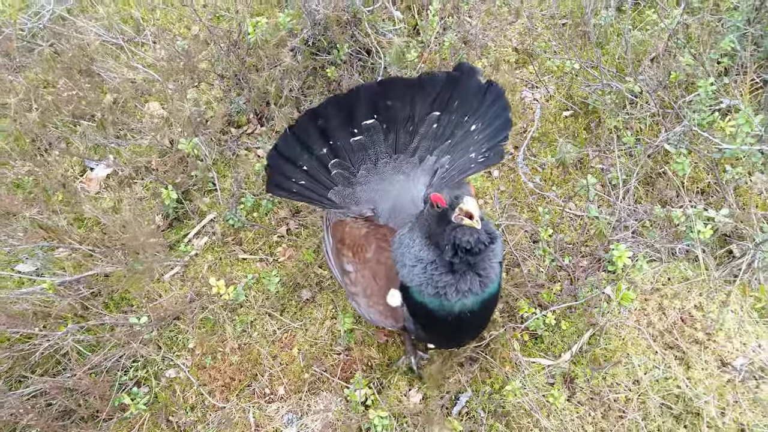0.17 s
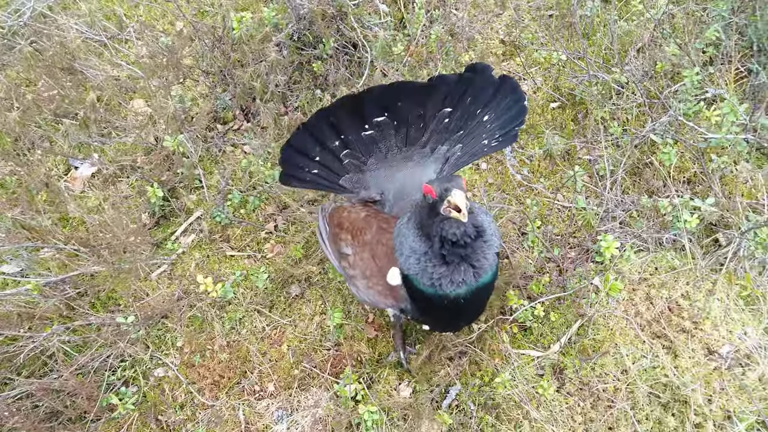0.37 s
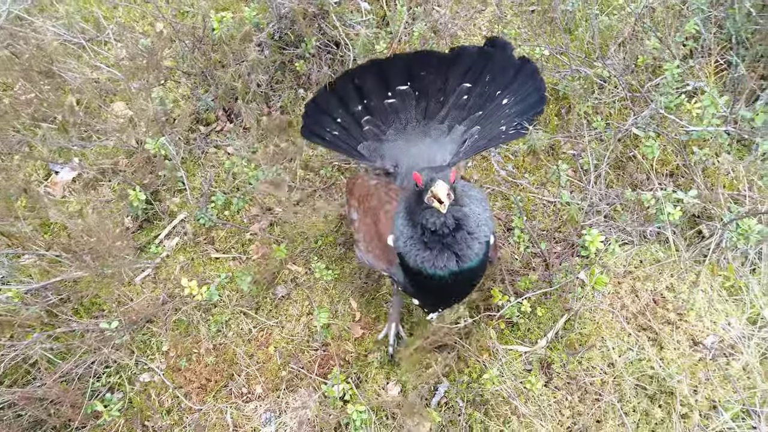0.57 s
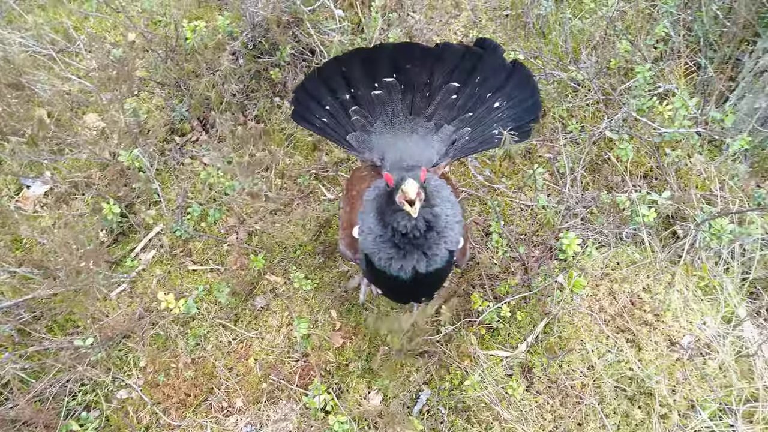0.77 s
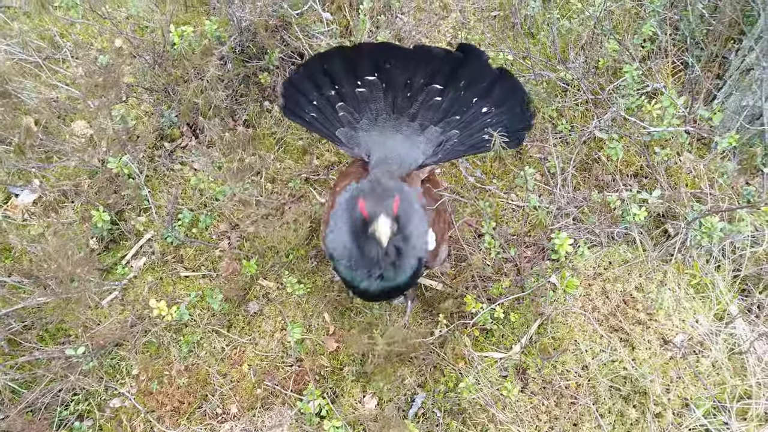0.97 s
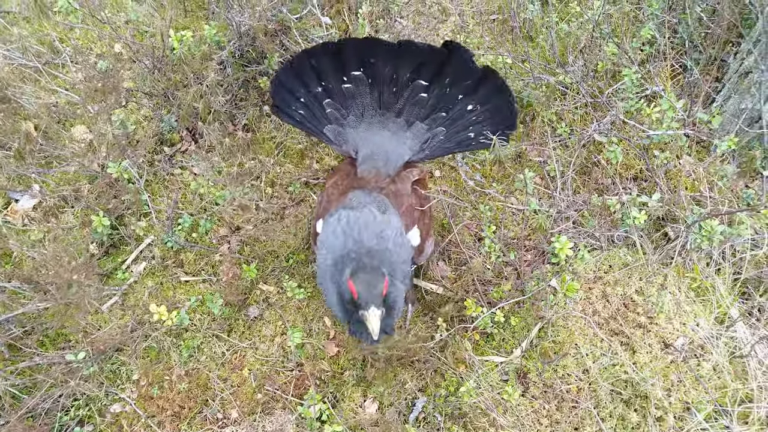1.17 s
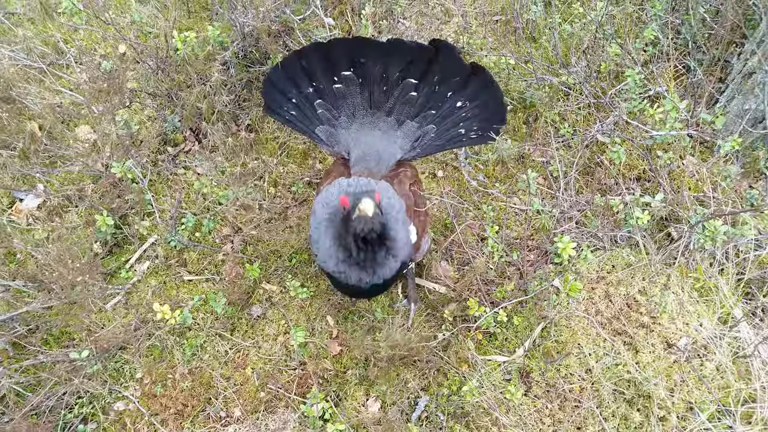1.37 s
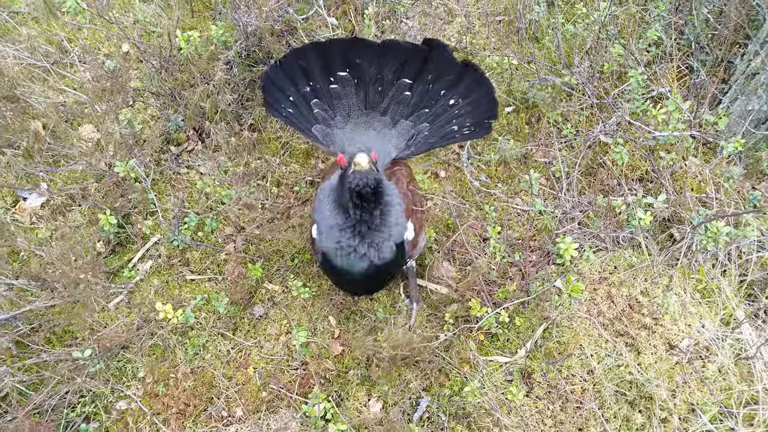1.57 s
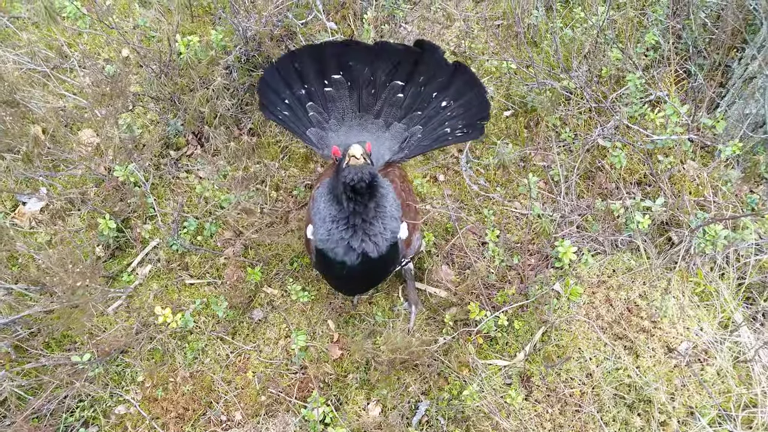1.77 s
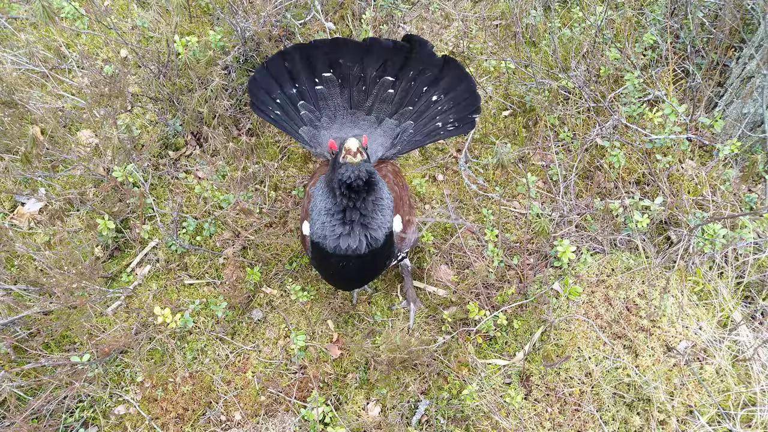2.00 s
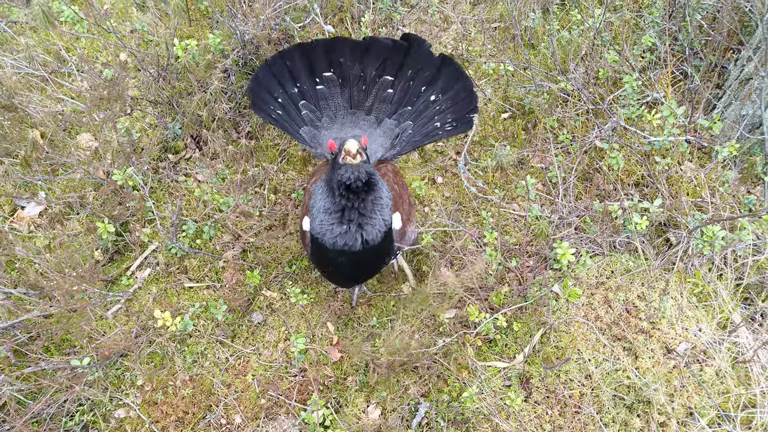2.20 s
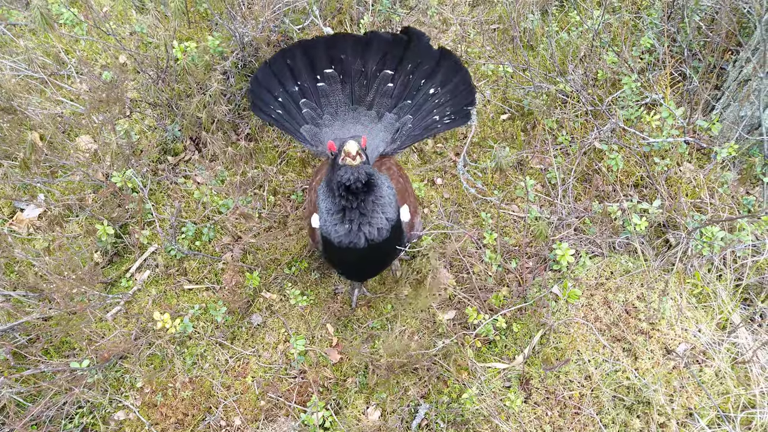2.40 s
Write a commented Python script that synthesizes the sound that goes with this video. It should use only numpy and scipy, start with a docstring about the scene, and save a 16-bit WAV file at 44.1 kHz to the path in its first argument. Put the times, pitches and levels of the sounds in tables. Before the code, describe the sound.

Close, dry outdoor sound of a large grouse: soft pops and a hiss, one hard click, then three rattling throaty croaks, followed by faint breath and twig ticks on the quiet forest floor.

```python
"""A large grouse displays a step from a microphone on the forest floor, under a faint bed of air.
Low rumble and deep thumps are there from the start; heather rustles and ticks under its feet (shaped noise).
Small pops (short rings) lead to an open-beak hiss (gritty noise through resonances), then a double click.
Three rasping notes follow: throat pulses ring throat, chest and beak and crowd into a hiss; a breath comes after.
The ground adds one faint echo of the bird, and the trees return a faint tail of dying noise."""
import sys
import numpy as np
from scipy import signal
from scipy.fft import rfft, irfft
from scipy.io import wavfile

SR = 44100
rng = np.random.default_rng(int(sys.argv[2]) if len(sys.argv) > 2 else 0)


def persist_wave(psi):
    """Save psi, clipped to +-1, as 16-bit WAV."""
    counts = np.round(np.clip(psi, -1, 1) * 32767).astype(np.int16)
    wavfile.write(sys.argv[1], SR, np.atleast_2d(counts).T)


N = 107692
T = np.arange(N) / SR

# how far the sound spreads to the sides: (frequency [Hz], gain of the side signal [dB])
SIDE_SPREAD = [(60, -26), (110, -44.5), (200, -41.5), (380, -44), (700, -6.5), (1290, -16), (2380, -11.5),
               (4400, -9.5), (8120, 3), (15000, -3.5)]


def amp(db):
    """Turns decibels into a pressure factor."""
    return 10 ** (np.asarray(db) / 20)


def evened(x):
    """Brings a signal to an RMS of one."""
    return x / np.sqrt(np.mean(x ** 2) + 1e-20)


def level(curve, col=1):
    """Gain along a curve of dB over time, silent outside it."""
    columns = np.transpose(curve)
    return amp(np.interp(T, columns[0], columns[col], -200, -200))


def colour(x, points):
    """Filters by a spectrum of (Hz, dB) points joined on a log-frequency axis."""
    f, db = np.transpose(points)
    hz = np.fft.rfftfreq(x.shape[-1], 1 / SR)
    gain = amp(np.interp(np.log(hz + 1), np.log(f + 1), db))
    return irfft(rfft(x) * gain, x.shape[-1])


def ring(peaks, swell=2.5):
    """Soft-starting resonances of alternating sign, in order of pitch; swell sets how fast each one builds up."""
    t = np.arange(2048) / SR
    out = np.zeros(2048)
    for k, (hz, width, db) in enumerate(sorted(peaks)):
        decay = np.exp(-np.pi * width * t)
        onset = 1 - np.exp(-swell * np.pi * width * t)
        out += (-1) ** k * amp(db) * width * decay * onset * np.sin(2 * np.pi * hz * t)
    return out


def through(x, taps):
    """Sends a signal through an impulse response."""
    return signal.oaconvolve(x, taps)[:N]


def clicks(per_s, spread_db):
    """Irregular clicks of random sign, a few of them large."""
    chance, size, sign = rng.random(N), rng.exponential(1, N), rng.standard_normal(N)
    return evened((chance < per_s / SR) * np.sign(sign) * amp(spread_db * np.minimum(size, 4)))


def rumble():
    """Lumpy low rumble: noise centred on 51 Hz, rising and sinking."""
    # (time [s], level before the trim [dB])
    rumble_level = [(0.0, -65), (0.1, -60), (0.14, -76), (0.39, -53.5), (0.47, -63.5), (0.95, -67.5),
                    (1.02, -37), (1.06, -62), (1.1, -63.5), (1.2, -71), (1.28, -36), (1.31, -42.5),
                    (1.59, -33.5), (1.66, -73), (1.71, -30), (1.77, -66.5), (2.41, -69.5), (2.44, -73.5)]
    trim_db = -3
    low = colour(rng.standard_normal(N), [(15, -30), (51, 0), (110, -6), (250, -24), (500, -60)])
    return evened(low) * level(rumble_level) * amp(trim_db)


def heather():
    """Crackling rustle spread over left and right, with single ticks of twigs as short bursts of banded noise."""
    # (time [s], level before the trim [dB])
    rustle_level = [(0.0, -60.5), (0.18, -58.5), (0.41, -65.5), (0.62, -65), (0.78, -57), (0.96, -68.5),
                    (1.0, -50.5), (1.12, -57), (1.19, -75), (1.41, -82.5), (1.54, -55), (1.7, -78),
                    (1.94, -83.5), (2.07, -65.5), (2.19, -50.5), (2.26, -55.5), (2.44, -67)]
    # spectrum of rubbing heather: (frequency [Hz], relative level per Hz [dB])
    rustle_tone = [(880, -30.5), (1500, -8), (2060, -5.5), (2610, -9.5), (4830, 1), (6180, 1.5), (8830, -5),
                   (11800, -1), (16000, -11)]
    # twig ticks: (time [s], peak before panning [dB], frequency [Hz], left over right [dB])
    ticks = [(0.0248, -41, 4530, -3), (0.057, -41, 4630, -1.0), (0.1078, -42.5, 10500, 16),
             (0.116, -43, 7430, -10), (0.157, -46, 7280, -1.0), (0.222, -43.5, 7340, -8),
             (0.2276, -49, 7010, -8), (0.369, -40, 11600, -6), (0.385, -56, 5360, -0.5),
             (0.4228, -55, 4260, -1.5), (0.9123, -44, 5270, -5), (0.943, -48, 11150, 17.5),
             (0.9611, -31.5, 7300, 7), (2.0226, -47.5, 4420, -4), (2.1485, -40.5, 4400, -6.5),
             (2.1975, -30.5, 11800, -1.5), (2.2105, -33.5, 5700, -4), (2.295, -41, 5970, -2.5),
             (2.3683, -47.5, 6100, 3)]
    crackles_per_s, crackle_spread_db, crackle_share = 2000, 9, 0.41
    rustle_width, trim_db = 0.84, 1.5
    tick_decay_s, tick_width = 0.003, 0.41  # a smaller width ratio gives a wider band

    def grain():
        crackle = crackle_share * clicks(crackles_per_s, crackle_spread_db)
        return crackle + (1 - crackle_share) * rng.standard_normal(N)

    mid, side = grain(), rustle_width * grain()
    tone = colour(np.array([mid + side, mid - side]), [(300, -52.5)] + rustle_tone)
    out = amp(trim_db) * evened(tone) * level(rustle_level)

    t = np.arange(400) / SR
    for s, db, hz, pan_db in ticks:
        burst = rng.standard_normal(400) * np.exp(-t / tick_decay_s)
        tick = colour(burst, [(hz * tick_width, -20), (hz, 0), (hz / tick_width, -8)])
        sides_db = db + np.array([[pan_db / 2], [-pan_db / 2]])
        start = round(s * SR)
        out[:, start:start + 400] += amp(sides_db) * tick / abs(tick).max()
    return out


def forest_air():
    """Steady shaped noise around the microphone, as mid and side before the side is spread."""
    # (frequency [Hz], relative level [dB])
    air_tone = [(59, -32.5), (100, -4.5), (398, -2.5), (648, 0), (2580, -15), (3940, -12), (4290, -13),
                (8830, -31), (14400, -30), (16000, -44)]
    air_db = -63.5
    return evened(colour(rng.standard_normal((2, N)), air_tone)) * amp(air_db)


def pops():
    """Small soft-edged mouth pops, each a short ring under a bell-shaped envelope."""
    # (time [s], envelope peak [dB], frequency [Hz], time from peak to 1/e [s])
    pop_events = [(.067, -51.5, 1300, 0.0015), (0.107, -47, 1120, 0.0016), (0.116, -42, 1120, 0.0013),
                  (0.129, -44.5, 1275, 0.0023), (0.136, -39, 1230, 0.001), (0.282, -56, 1300, 0.0011),
                  (.355, -53.5, 1790, 0.0025), (.406, -39.5, 278, 0.0026), (.407, -39, 1270, 0.0016),
                  (.408, -39.5, 730, 0.0016), (0.426, -36, 710, 0.001), (0.417, -44, 1350, 0.0028),
                  (0.423, -49.5, 1850, 0.0026), (0.426, -42.5, 2310, 0.002), (0.435, -49, 500, 0.0026),
                  (0.442, -49, 201, 0.006), (0.618, -53.5, 290, 0.0097), (.777, -48, 424, .008),
                  (0.798, -43, 260, 0.0036), (0.99, -45, 301, 0.0059), (1.348, -31, 219, 0.0034),
                  (1.489, -38.5, 377, .005), (1.647, -43.5, 774, 0.0053), (1.733, -36, 341.7, 0.0052),
                  (1.766, -54.5, 250, 0.0054), (2.199, -46, 2060, 0.0012)]
    out = np.zeros(N)
    for s, db, hz, length in pop_events:
        envelope = amp(db) * np.exp(-((T - s) / length) ** 2)
        out += envelope * np.sin(2 * np.pi * hz * (T - s))
    return out


def thumps():
    """Deep thumps, each a short low swell of one or a few cycles under a bell-shaped envelope."""
    # (centre [s], envelope peak [dB], frequency [Hz], time from peak to 1/e [s])
    thump_events = [(0.086, -49.5, 44.3, 0.018), (0.389, -51, 57, 0.021), (1.01, -38, 110, 0.01),
                    (1.044, -30.5, 109.2, 0.016), (1.285, -24, 71.3, 0.005), (1.353, -27.5, 75.3, 0.0071),
                    (1.396, -27, 144, 0.0098), (1.458, -26.5, 64.3, 0.0086), (1.506, -29, 93.3, 0.0084),
                    (1.603, -54, 74.5, 0.02), (1.7117, -25, 62.3, 0.012)]
    out = np.zeros(N)
    for s, db, hz, length in thump_events:
        envelope = amp(db) * np.exp(-((T - s) / length) ** 2)
        out += envelope * np.sin(2 * np.pi * hz * (s - T) + 1.1)
    return out


def breathing():
    """Slightly gritty air through the resonances of the open beak: the hiss, and later the bird's breath."""
    # open-beak hiss: (time [s], level [dB])
    hiss = [(0.39, -80), (0.394, -78), (0.404, -58.5), (0.452, -50), (0.498, -46), (0.526, -39.5),
            (0.546, -51), (0.578, -40.5), (0.678, -56), (0.698, -64), (0.72, -56.5)]
    # beak resonances in the hiss: (frequency [Hz], width [Hz], relative level [dB])
    hiss_beak = [(830, 250, 0), (2040, 440, 0.5), (2877, 120, -0.5), (3670, 530, -0.5), (4490, 310, 2),
                 (5600, 1300, -9), (8400, 500, -13.5), (10000, 540, -6.5), (12720, 2600, -14.5)]
    # the bird's breath: (time [s], level [dB])
    breath = [(1.75, -67), (1.77, -69), (1.88, -79.5), (1.95, -64.5), (2.05, -60.5), (2.2, -66),
              (2.35, -67), (2.44, -74)]
    # beak resonances in the breath: (frequency [Hz], width [Hz], relative level [dB])
    breath_beak = [(3164, 193, 2.5), (4244, 305, -2), (760, 200, 0.7)]
    air = evened(rng.standard_normal(N) + 0.37 * clicks(650, 1.2))
    out = np.zeros(N)
    for curve, peaks in [(hiss, hiss_beak), (breath, breath_beak)]:
        out += level(curve) * evened(through(air, ring(peaks)))
    return out


def throat_pulses():
    """Strong separate pulses that drive throat, chest and beak; in throat and beak each trails a dying flutter."""
    # (time [s], level [dB], chest relative to that [dB], treble relative to that [dB])
    pulses = [(0.7392, -3, -41, -23), (0.7427, -10.5, -35.5, -37), (1.0021, -16, -3.5, -22),
              (1.0144, -8.5, -11, -28.5), (1.0241, 0, -41, -25), (1.032, -3, -42.5, -31),
              (1.0345, -6.5, -28, -12.5), (1.0384, 0, -38.5, -20), (1.0514, -8.5, -11.5, -21),
              (1.0584, -2, -38, -20.5), (1.0702, -4, -42.5, -23), (1.0728, -2, -38.5, -26.5),
              (1.077, -5.5, -42.5, -24.5), (1.0993, -9, -21.5, -16), (1.104, -10.5, -14, -29.5),
              (1.1095, -17, -25, -26.5), (1.113, -9.5, -28.5, -25), (1.1139, -8, -40.5, -23),
              (1.1216, -11, -39.5, -20.5), (1.374, -9.5, -17, -27), (1.381, -21, -38, -10),
              (1.388, -12, -11.5, -10), (1.3961, -10.5, -14.5, -16), (1.4193, -26.5, -30.5, -18),
              (1.4962, -23, -3.5, -40), (1.5081, -22, -2, -39), (1.521, -17, -7.5, -34),
              (1.5319, -7.5, -24, -48), (1.5418, -12.5, -15.5, -51), (1.5507, -9, -33, -29),
              (1.559, -14, -18, -32), (1.726, -32.5, -2, -37.5), (1.73, -35.5, -12, -40)]
    flutter_s, flutter_share, flutter_per_s = 0.0035, 0.5, 4000
    drive = np.zeros((3, N))
    t = np.arange(800) / SR
    for s, db, chest_db, treble_db in pulses:
        kept = rng.random(800) < flutter_per_s / SR
        trail = kept * np.sign(rng.standard_normal(800)) * np.exp(-t / flutter_s) * (t > 0)
        click = 1.0 * (t == 0)
        burst = click + flutter_share * trail / np.linalg.norm(trail)
        gains = amp(db + np.array([[0], [chest_db], [treble_db]]))
        start = round(s * SR)
        drive[:, start:start + 800] += gains * np.array([burst, -click, burst])
    return drive


def flaps(per_s, spread_db):
    """Unevenly spaced pulses of one sign and uneven size."""
    jitter = 0.5
    gaps, size = rng.standard_normal(N // 20), rng.exponential(1, N // 20)
    steps = np.exp(jitter * gaps - jitter ** 2 / 2)  # averages one
    at = (np.cumsum(steps) * SR / per_s).astype(int)
    out = np.zeros(N)
    out[at[at < N]] = amp(spread_db * np.minimum(size, 3))[at < N]
    return evened(out)


def rasp():
    """Dense pulses run together with plain air, driving throat, chest and beak through each note."""
    # one table a note: (time [s], level before the trim [dB], chest relative [dB], treble relative [dB])
    notes = [
        [(1.06, -16.5, -7.5, -9), (1.074, -13.5, -34, -14.5), (1.086, -20.5, -32, -12),
         (1.096, -18, -21.5, -14), (1.1, -25, -14.5, -15), (1.111, -24.5, -5, -28), (1.117, -18, -19, -11.5),
         (1.127, -29.5, -27, -25), (1.133, -69, -12, -13)],
        [(1.376, -34, -3, -27), (1.382, -28, -4, -9), (1.389, -16.5, -26.5, -15.5), (1.395, -33, 1, -22),
         (1.401, -24.5, -26, -27), (1.41, -31, -1, -10.5), (1.426, -22, -12, -11.5), (1.458, -37.5, -21, -23),
         (1.475, -97, 12, -15.5)],
        [(1.561, -22.5, -25, -28), (1.575, -19.5, -39, -23.5), (1.589, -18.5, -14.5, -38),
         (1.603, -19.5, -23, -28), (1.619, -33.5, -33, -16), (1.633, -53, -11.5, -19.5),
         (1.649, -42.5, -32, -22), (1.659, -52, -31.5, -25), (1.673, -43.5, -40, -29), (1.7, -70, 7, -23)],
    ]
    # one row a note: (pulses a second [1/s], share of plain air [0-1])
    grain = [(520, .3), (750, .35), (600, .25)]
    trim_db, spread_db = -3, 1.6
    drive = np.zeros((3, N))
    for (per_s, air), note in zip(grain, notes):
        grit = evened((1 - air) * flaps(per_s, spread_db) + air * rng.standard_normal(N))
        throat = amp(trim_db) * grit * level(note)
        drive += np.array([throat, throat * level(note, 2), throat * level(note, 3)])
    return drive


def dull(taps, hz):
    """Rolls off the treble of a resonance above a corner."""
    return signal.sosfilt(signal.butter(4, hz, fs=SR, output="sos"), taps)


def spans(rows):
    """Pairs each set of resonances with the stretch of time it holds for."""
    ends = [row[0] for row in rows[1:]] + [np.inf]
    return [(peaks, (T >= start) & (T < end)) for (start, peaks), end in zip(rows, ends)]


def voice():
    """Pulses and rasp ring the throat and chest, whose resonances change through the notes, and the beak."""
    # throat resonances: (from time [s], [(frequency [Hz], width [Hz], relative level [dB])])
    throats = [ (0, [(2027, 330, 0.5), (2820, 240, -1), (3686, 280, 0), (5070, 250, -10), (6260, 190, -14),
               (1550, 276, -8), (494, 172, -7)]), (.9, [(1990, 236, 1), (3143, 440, -5), (3830, 213, -0.5),
               (5600, 850, -13), (4630, 310, -11), (1492, 170, -8), (662, 190, -10.5)]),
               (1.055, [(2043, 287, 4.5), (2996, 323, 3.5), (3630, 450, -3), (5680, 420, -4),
               (4460, 390, -15.5), (1593, 141, -0.5), (724, 143, -18.5)]), (1.3, [(2040, 160, -1),
               (3100, 346, 1), (3950, 260, -10.5), (5280, 480, -10), (6170, 340, -11.5), (1640, 124, -14.5),
               (760, 177, -12.5)]), (1.41, [(1990, 380, -6.5), (3010, 410, -7.5), (4070, 150, -14),
               (5407, 87, 7), (6250, 250, -16.5), (1602, 340, -6), (760, 112, -8)]),
               (1.485, [(1920, 320, -2), (3130, 110, -2.5), (1438, 190, -7), (4000, 340, -19.5),
               (5050, 180, -18), (5700, 350, -23), (2576, 50, 3), (760, 85, 0)]), (1.528, [(1930, 230, -3),
               (3086, 250, 4.5), (3665, 145, 6.5), (4610, 400, -4.5), (5550, 350, -3.5), (6350, 280, -6.5),
               (1335, 220, -5), (2470, 220, -4.5), (760, 99, -10)]), (1.628, [(1590, 190, 1.5),
               (2180, 200, -0.5), (3080, 120, 3.5), (4450, 180, 1), (5400, 450, -5.5)]),
               (1.71, [(1630, 205, 0), (2580, 230, -6), (4620, 46, 0.5), (5150, 75, -1), (760, 73, -6.5),
               (5920, 170, -16)])]
    # chest resonances: (from time [s], [(frequency [Hz], width [Hz], relative level [dB])])
    chests = [(0, [(397, 80, 7), (179, 140, 1)]), (1.47, [(347.4, 49, 5.5), (164, 63, -5.5)])]
    # treble resonances of the beak: (frequency [Hz], width [Hz], relative level [dB])
    beak = [(8100, 520, 0), (8800, 390, -2.5), (11600, 1400, 0.5)]
    throat_top_hz, beak_top_hz = 7800, 12600
    strong, dense = throat_pulses(), rasp()
    # (resonance, row of the drive, when it sounds)
    parts = [(ring(peaks, 20), 1, now) for peaks, now in spans(chests)]
    parts += [(dull(ring(beak), beak_top_hz), 2, 1)]
    parts += [(dull(ring(peaks), throat_top_hz), 0, now) for peaks, now in spans(throats)]
    out = np.zeros(N)
    for taps, k, now in parts:
        out += through(strong[k] * now, taps / abs(taps).max())  # scaled by the peak of the ring
        out += through(dense[k] * now, taps / np.linalg.norm(taps))  # scaled by the energy of the ring
    return signal.sosfilt(signal.butter(3, 120, "high", fs=SR, output="sos"), out)


def with_ground(bird):
    """Adds one faint, late copy of the bird, returned by the ground."""
    delay_s, echo_db = 0.0099, -28
    return bird + amp(echo_db) * np.roll(bird, round(delay_s * SR))


def bird_side(bird):
    """Left-right difference of the bird: part scattered sound, part phase shift."""
    scatter_share = 0.49
    taps = rng.standard_normal(2000) * np.exp(-np.arange(2000) / 250)
    scattered = through(bird, taps / np.linalg.norm(taps))
    return colour(scatter_share * scattered + signal.hilbert(bird).imag, SIDE_SPREAD)


def trees(bird):
    """Faint noise tails of the bird, left and right, each band dying at its own speed."""
    # (frequency [Hz], time to fall by 60 dB [s])
    decay = [(300, 0.3), (2000, 0.23), (4000, 0.21), (6000, 0.043), (10000, 0.1)]
    tail_db = -22
    hz, t, bands = signal.stft(rng.standard_normal((2, SR // 2)), SR, nperseg=256)
    f, t60 = np.transpose(decay)
    fall = amp(-60 * t / np.interp(hz, f, t60)[:, None])
    taps = signal.istft(bands * fall, SR, nperseg=256)[1]
    taps *= np.clip(np.arange(taps.shape[1]) / SR / 0.0033 - 0.5, 0, 1)  # silent at first, then fades in
    taps /= np.linalg.norm(taps[0])
    tail = signal.fftconvolve(bird[None], taps, axes=1)[:, :N] * amp(tail_db)
    side = colour(tail[0] - tail[1], SIDE_SPREAD)
    return tail.mean(0) + np.array([[1], [-1]]) * side


def scene():
    """Sets the bird a step away among heather, air and trees, in left and right."""
    bird = with_ground(pops() + breathing() + voice())
    air_mid, air_side = forest_air()
    mid = bird + air_mid
    side = bird_side(bird) + colour(air_side, SIDE_SPREAD)
    return np.array([mid + side, mid - side]) + trees(bird) + rumble() + thumps() + heather()


def record(dry):
    """Band limit: a steep low-pass ends the treble near 15.8 kHz."""
    edge_hz = 15800
    taps = signal.firwin(511, edge_hz, window=("kaiser", 9), fs=SR)
    return signal.oaconvolve(dry, taps[None], "same")


dry = scene()
out = record(dry)
persist_wave(out)
```